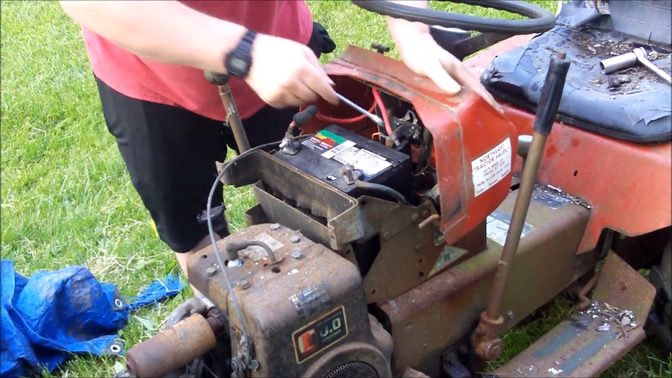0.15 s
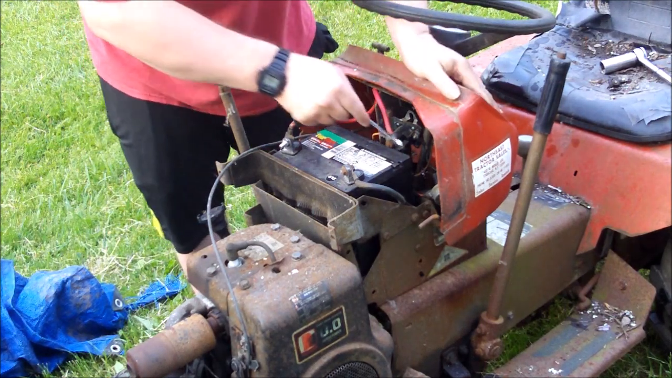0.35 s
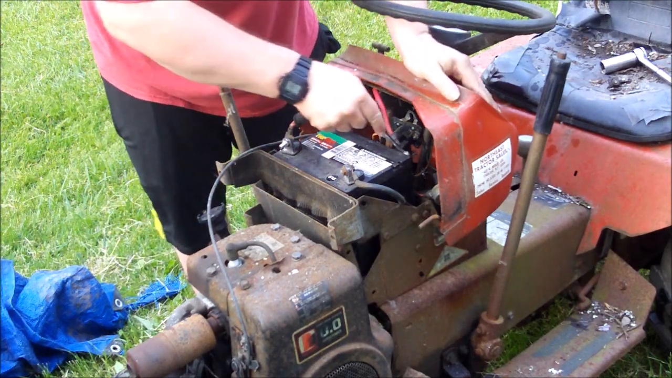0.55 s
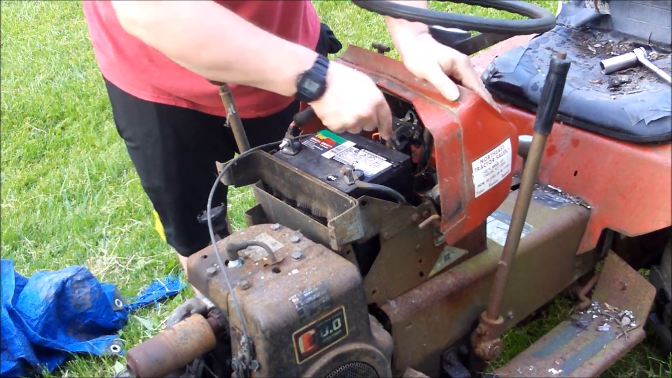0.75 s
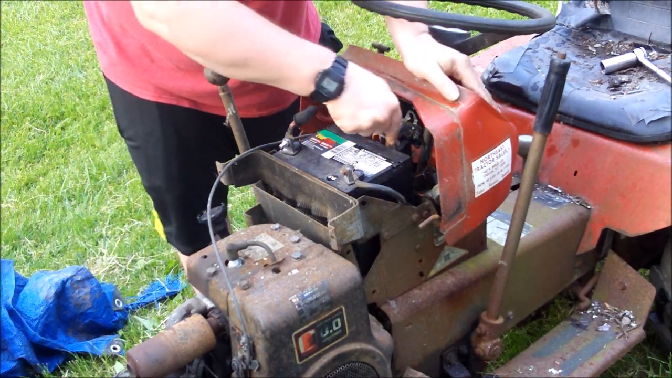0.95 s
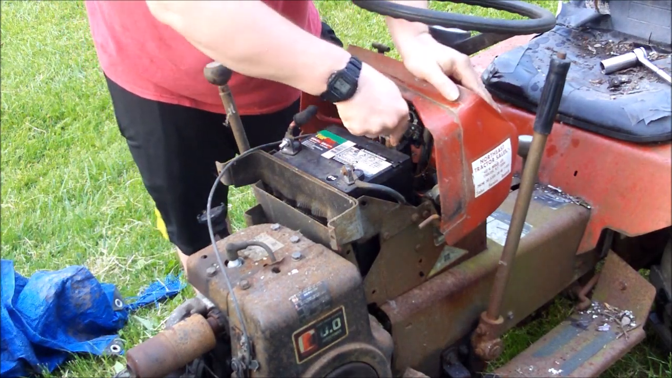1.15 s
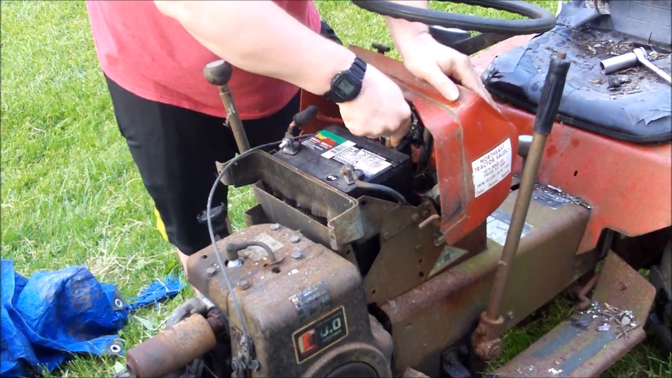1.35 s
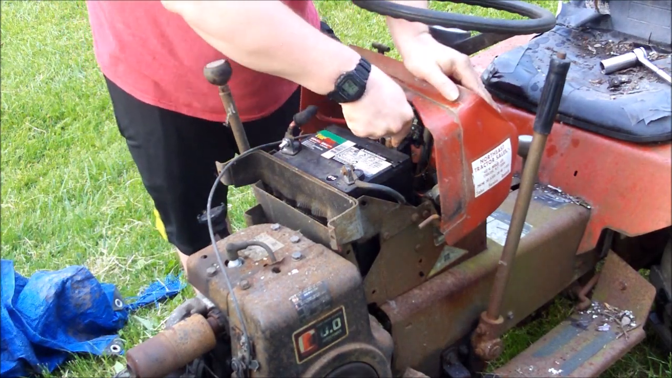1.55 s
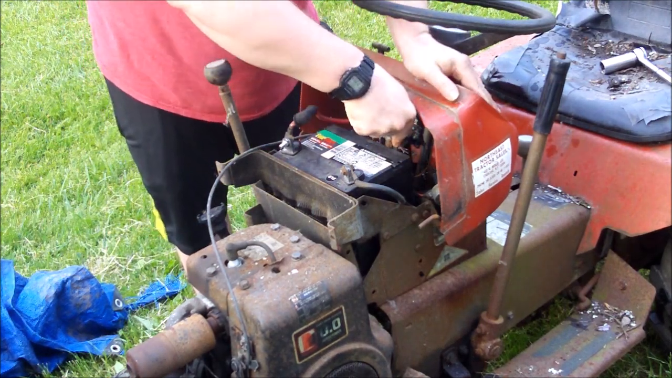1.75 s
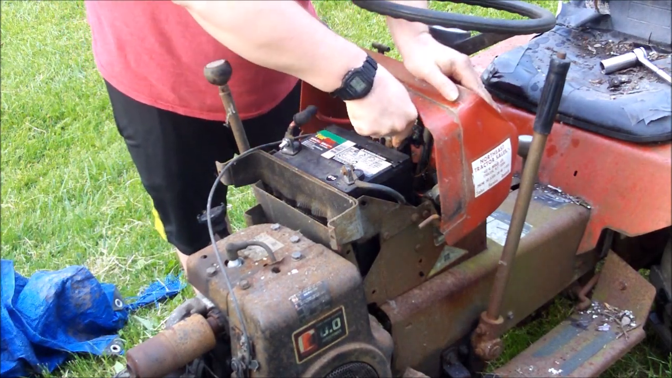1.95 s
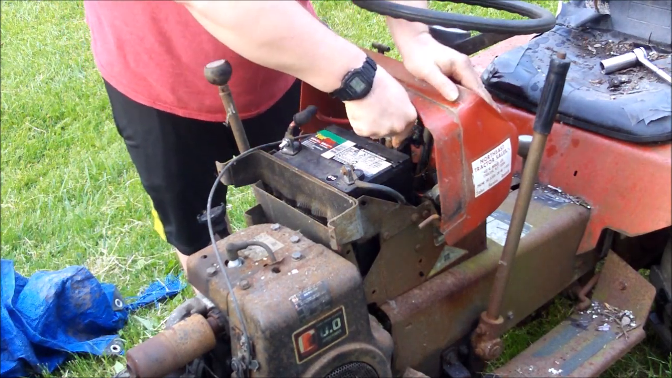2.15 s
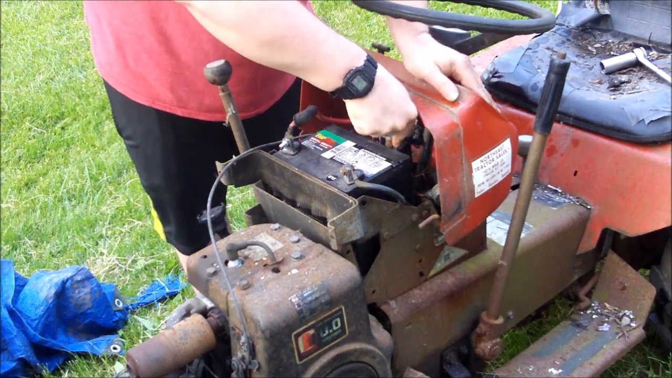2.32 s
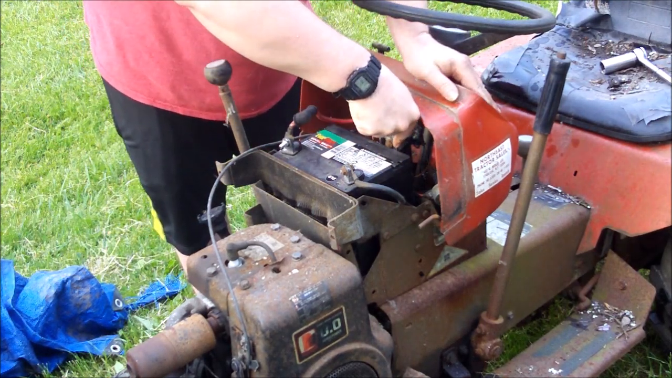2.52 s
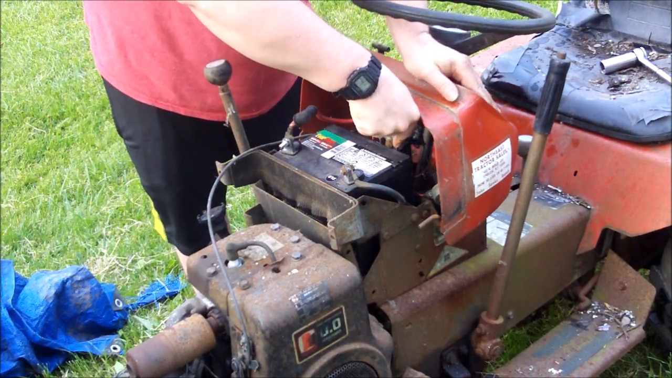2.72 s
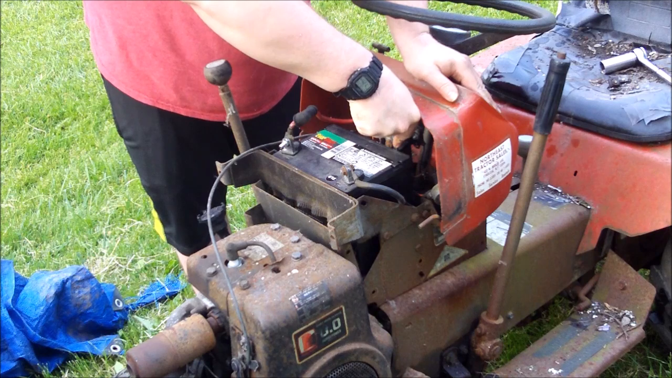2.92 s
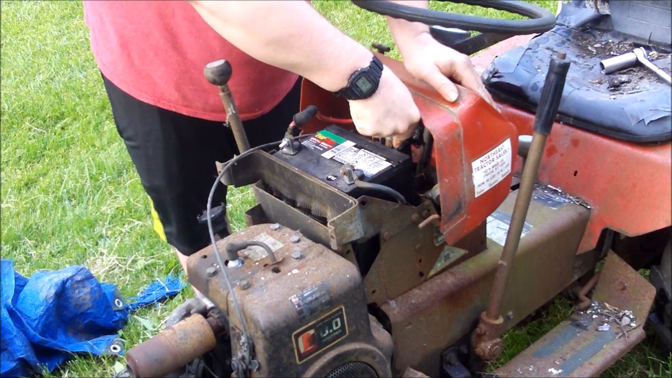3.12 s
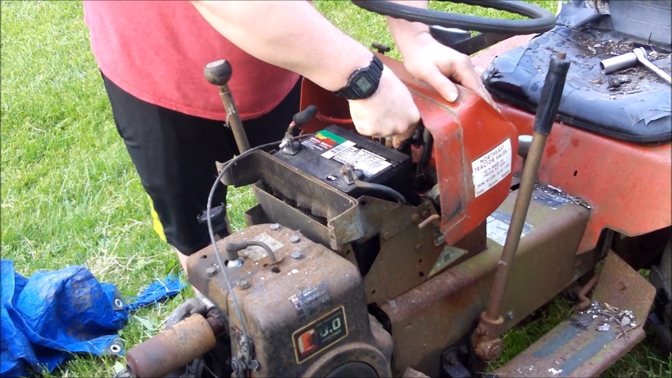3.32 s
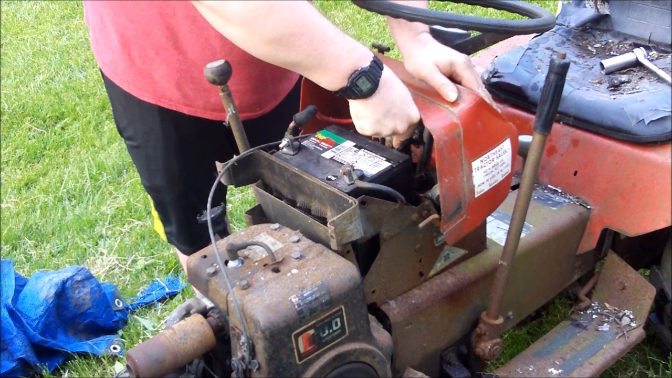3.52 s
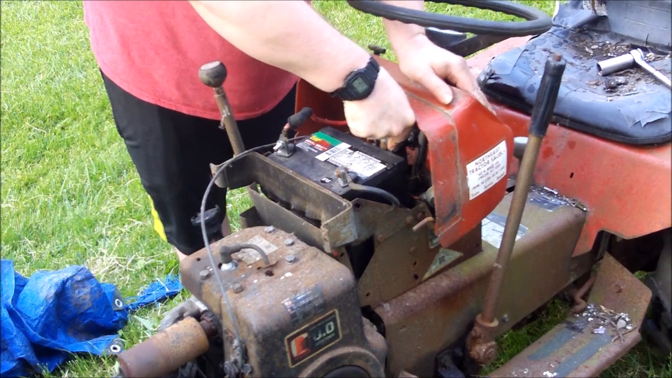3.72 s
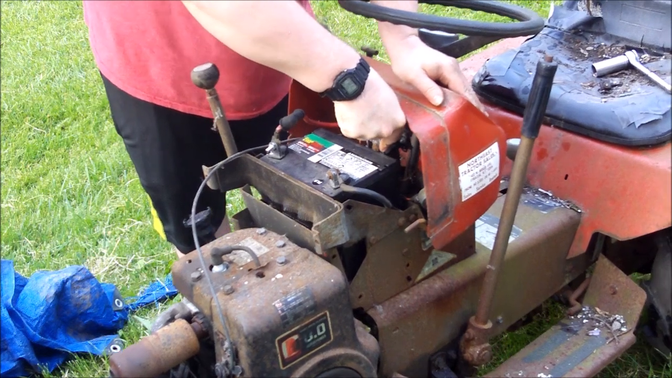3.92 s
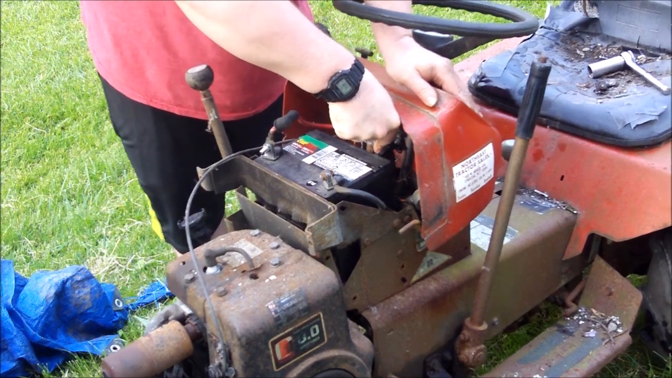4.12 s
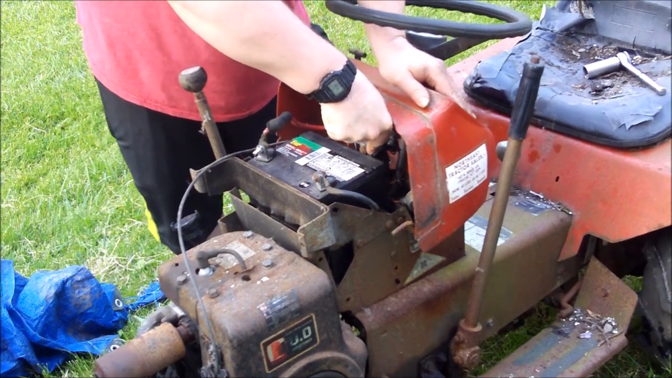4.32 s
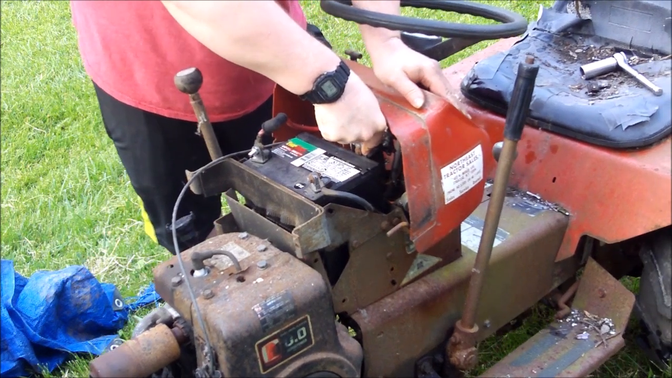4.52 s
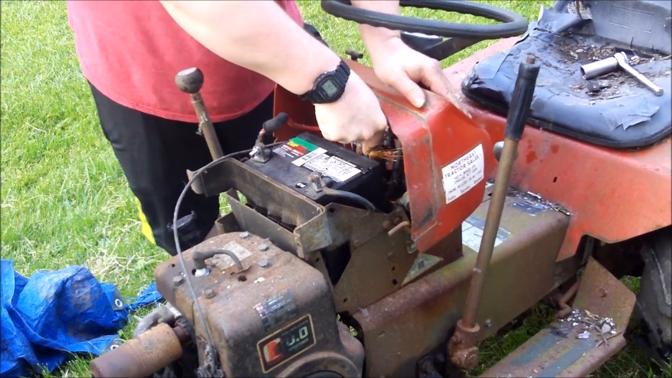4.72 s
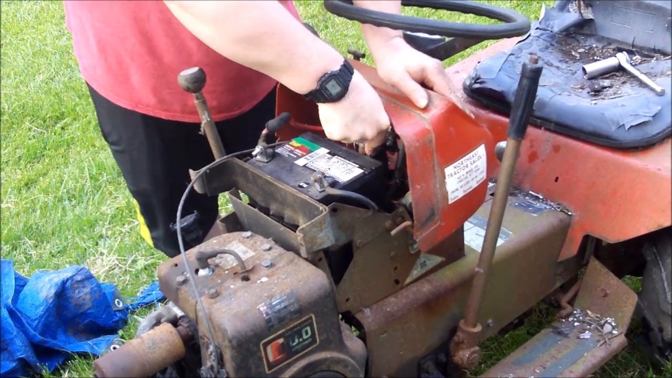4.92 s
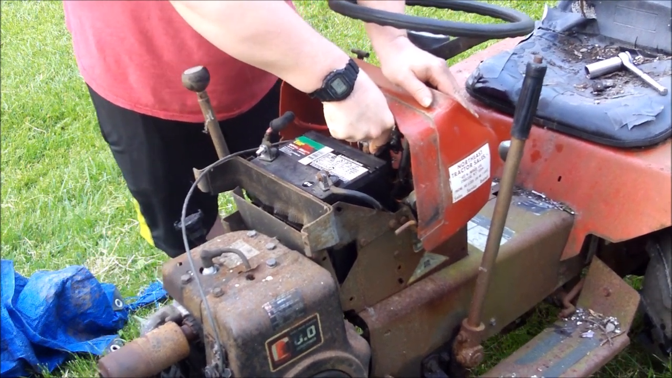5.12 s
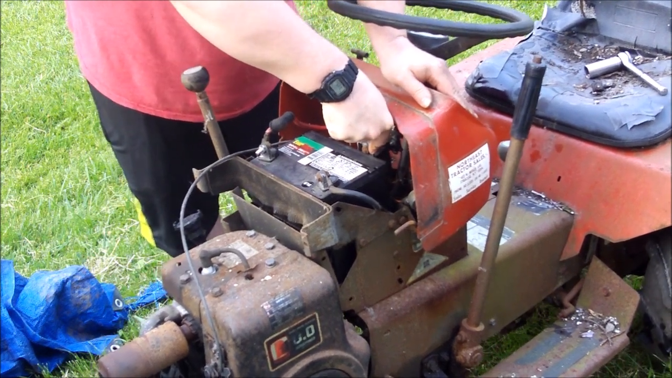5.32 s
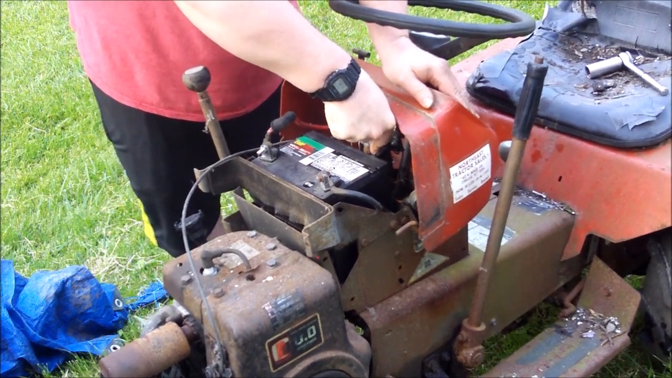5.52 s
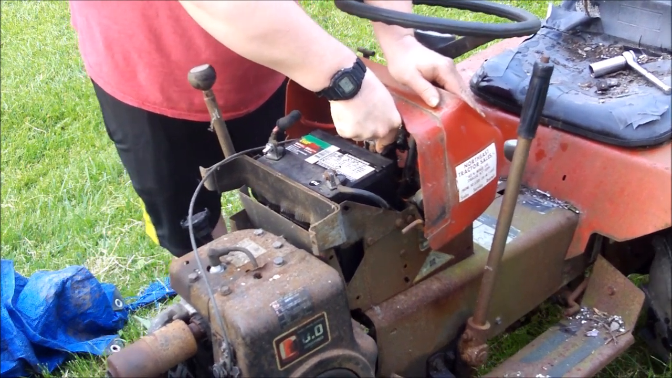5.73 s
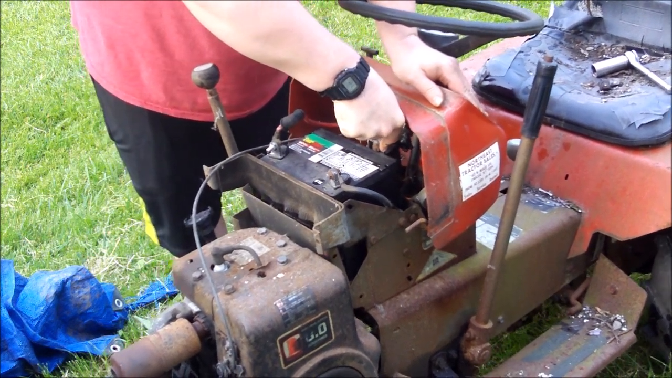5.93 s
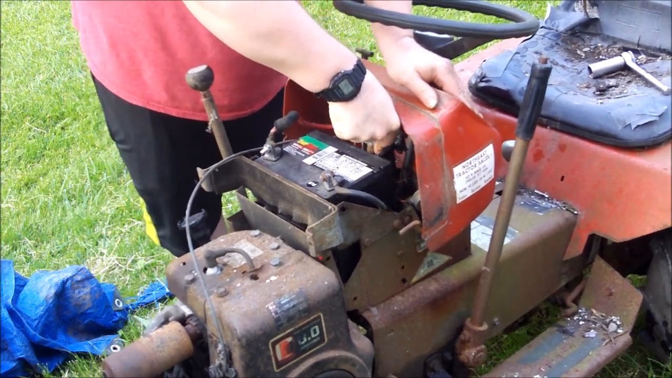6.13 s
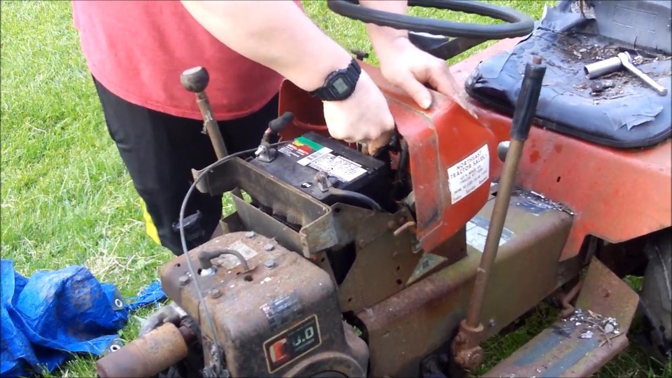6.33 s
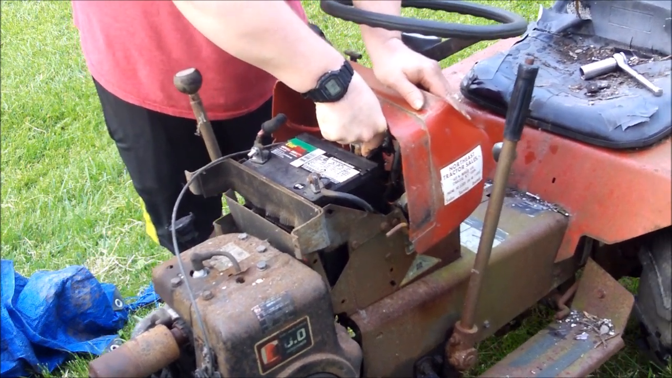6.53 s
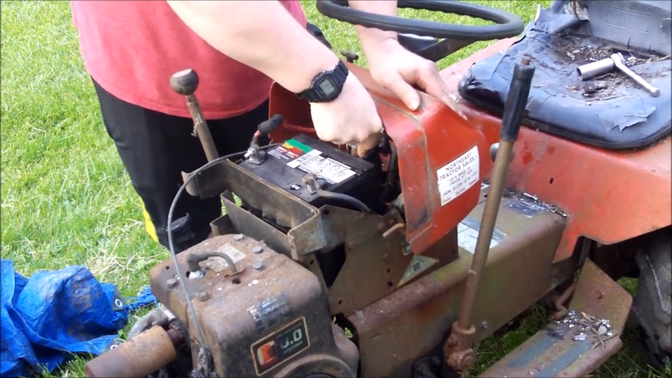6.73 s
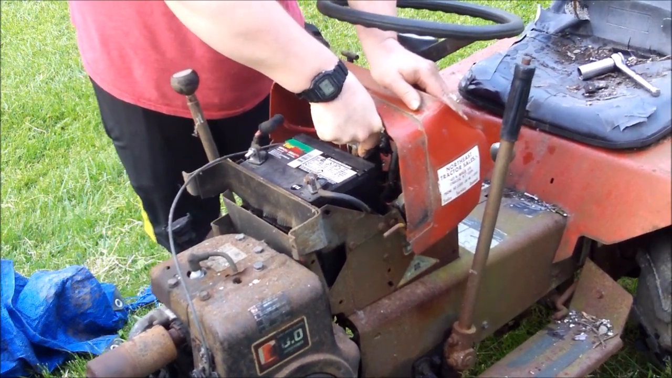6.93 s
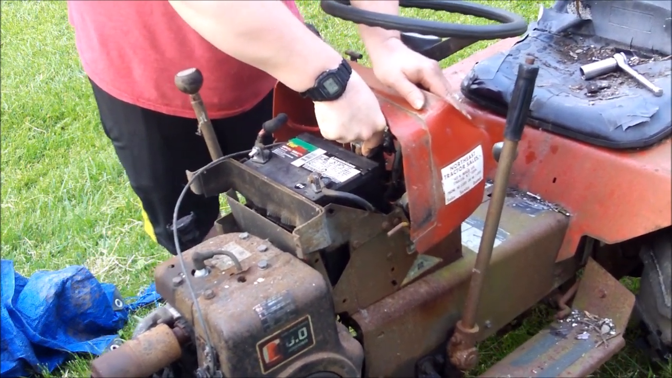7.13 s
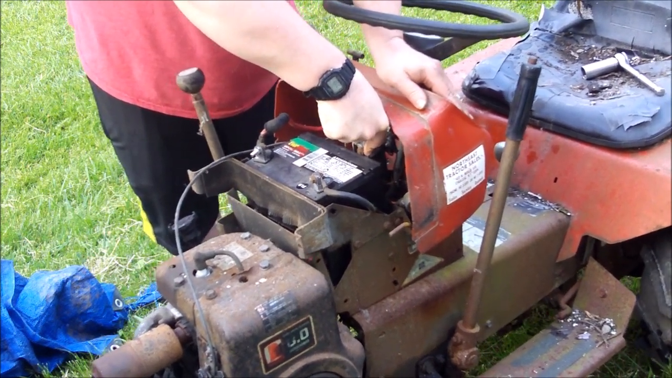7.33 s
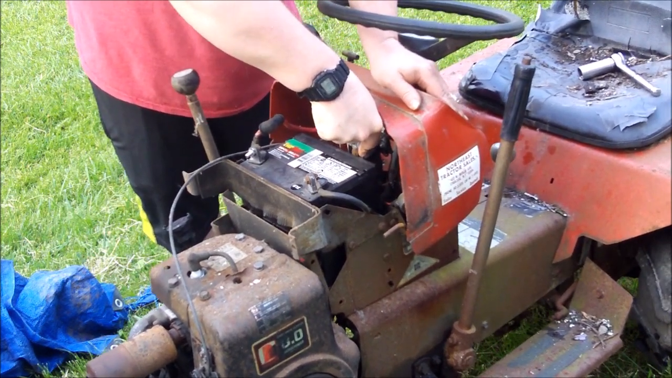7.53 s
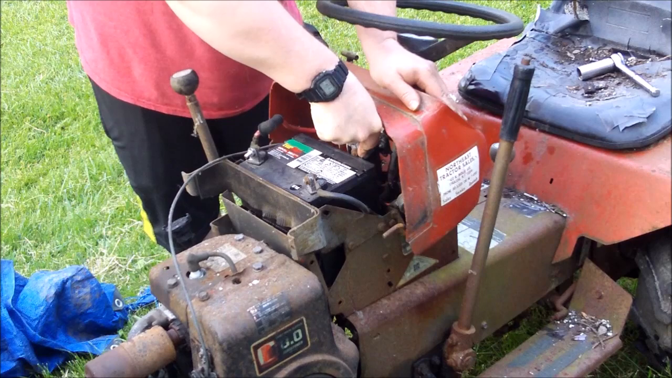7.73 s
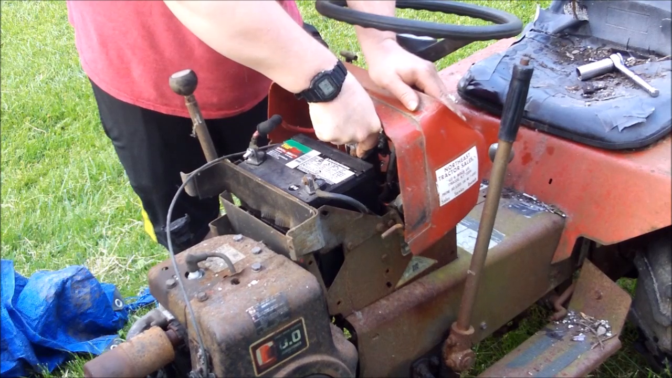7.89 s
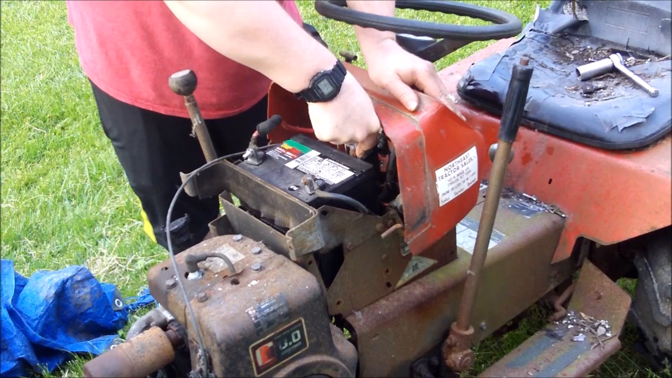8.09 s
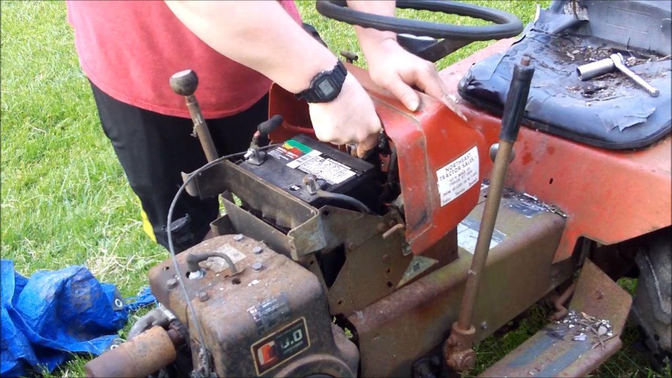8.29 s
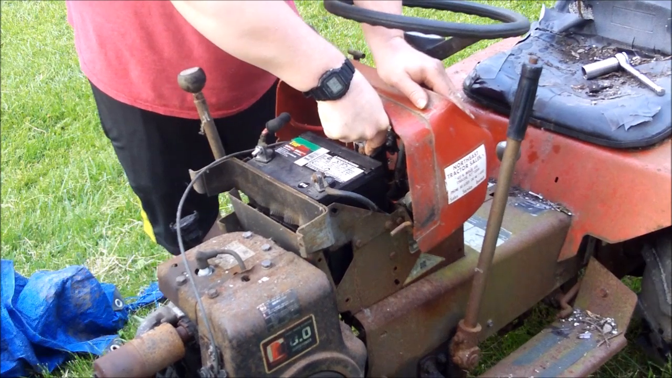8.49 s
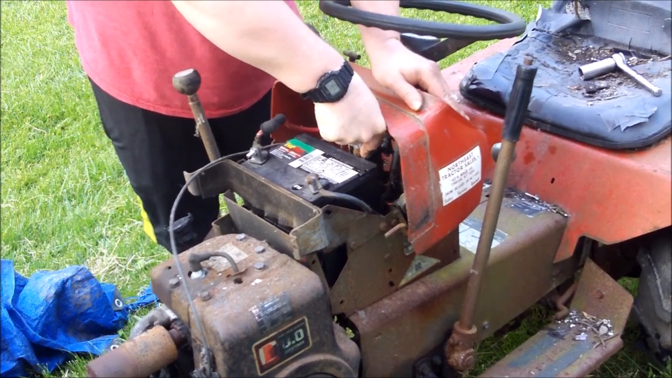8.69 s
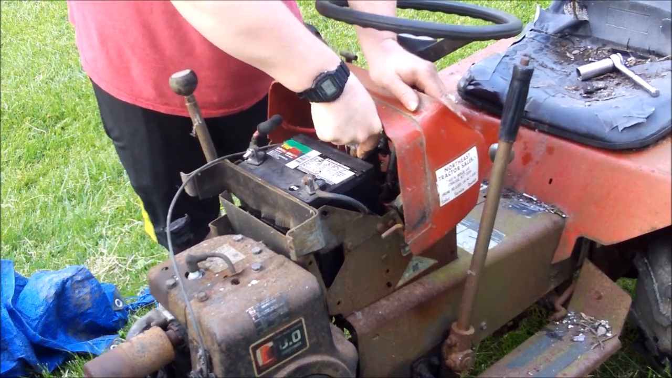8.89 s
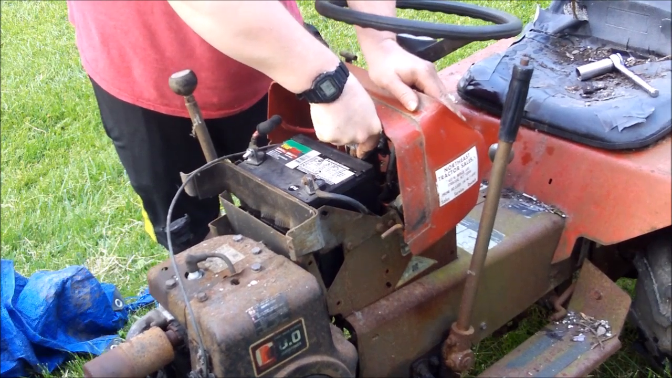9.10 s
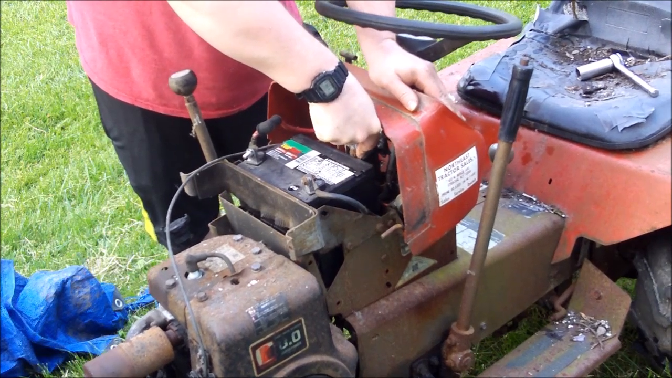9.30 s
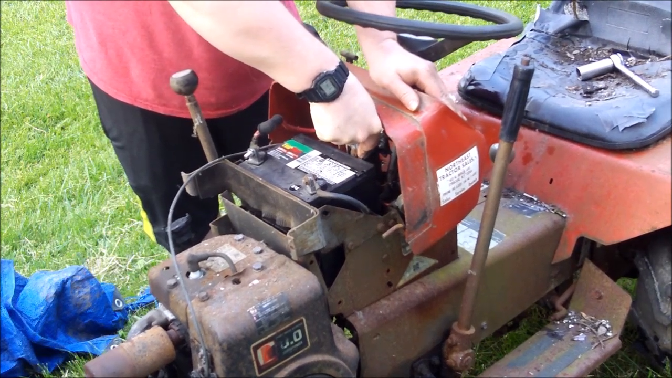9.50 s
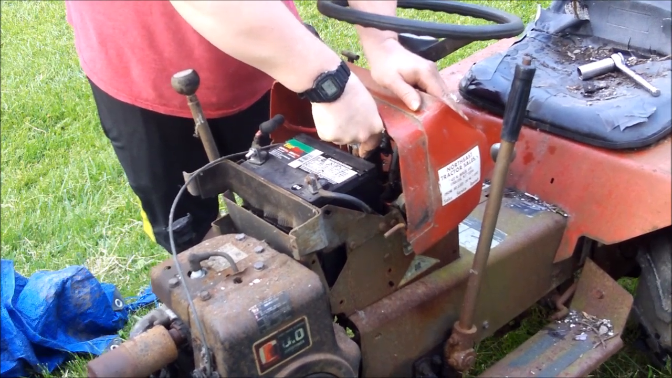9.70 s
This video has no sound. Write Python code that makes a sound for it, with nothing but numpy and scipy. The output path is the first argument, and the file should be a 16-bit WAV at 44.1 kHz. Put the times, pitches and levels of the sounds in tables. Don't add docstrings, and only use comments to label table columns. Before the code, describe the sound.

Dense, bright gear-tooth clatter from a starter motor, switched on and off by a slipping tool. Small sparks and clanks precede the first bursts; a longer grind starts with a singing metallic edge, turns to chatter, stutters rapidly, then holds on until a sudden stop. Dull distant air and a faint high electrical buzz lie behind. Dry open yard, close, slightly overloaded single microphone with little low end.

```python
import sys
import numpy as np
from scipy import signal
from scipy.fft import rfft, irfft
from scipy.io import wavfile
from scipy.ndimage import uniform_filter1d

SR = 44100
rng = np.random.default_rng(int(sys.argv[2]) if len(sys.argv) > 2 else 0)


def makeup_ratio(level_db):
    decades = np.asarray(level_db, float) / 20
    return 10 ** decades


def to_wav(s):
    ch = np.atleast_2d(s).T
    pcm = np.round(np.clip(ch, -1, 1) * 32767)
    wavfile.write(sys.argv[1], SR, pcm.astype(np.int16))


N = 429975
STEP = 32

# [f/Hz, level/dB per Hz]
AIR_SPECTRUM = [(30, -33), (60, -15.5), (124, -19), (200, -12.5), (300, -15.5), (460, -12.5), (900, -6),
                (1500, -10), (1800, -16.5), (2700, -18.5), (3700, -25.5), (6000, -27.5), (9000, -31),
                (16000, -48)]
# [width/Hz, level/dB, firm-seat gain/dB]
AIR_HZ = [452, 588, 767, 916, 1293, 1411, 1647, 2410, 3200]
AIR_MODES = [(40.4, 2.5, -14), (20, 0.5, 0), (20, 0, 0), (30, 4.5, 0), (15, -13, 0), (20, 1, 0),
             (20.2, -1, 0), (40, -24, 0), (30, -9, 0)]
# [t/s, level/dB]
AIR_GAIN = [(0, -52), (.5, -51.5), (.95, -50), (1.6, -50), (2.0, -55.5), (2.25, -55), (9.75, -77)]
# [f/Hz, level/dB]
FAR_TONES = [
    (964, -60),
    (1934, -70),
    (14987, -84),
]
# [t/s, gear level/dB, housing minus gear/dB, t60/s]
TICKS = [(0.664, -46, -9, 0.034), (.968, -22.5, -12, 0.038), (1.446, -48, 12.5, 0.071),
         (1.481, -39, -12, 0.045), (1.512, -48, 9, .07), (1.581, -64, 17, 0.058),
         (1.648, -41.5, -1.5, 0.071), (1.667, -26.5, 1.5, 0.5), (1.94, -53, -6, 0.031),
         (1.959, -42, -12, 0.033), (2.249, -48, -1, 0.14)]
# [f/Hz, level/dB per Hz]
TICK_SPECTRUM = [(1200, -31), (2200, -1), (2600, -2.5), (4000, 4), (6000, 3), (9000, 0.5), (15000, -13)]
# [makes t/s, breaks t/s, bite/dB, rise/s, coasting fall/dB per s]
CONTACTS = [(0.983, 1.333, 15.5, 0.02, 394), (1.673, 1.818, 11, .006, 406),
            (2.262, 4.658, 6.5, 0.0043, 400), (4.676, 4.72, -1.5, .02, 350), (4.753, 4.897, 4, 0.014, 650),
            (4.917, 4.952, 2.5, 0.0094, 495), (5.007, 5.265, 3.5, 0.0068, 330),
            (5.353, 5.506, 4, 0.0045, 242), (5.569, 5.607, 3.5, 0.014, 454), (5.646, 5.808, 3, 0.0122, 600),
            (5.815, 6.919, 3, .012, 320), (6.949, 9.568, 2.5, 0.01, 152), (9.61, 9.662, 4.5, 0.021, 242),
            (9.704, 9.803, 1.5, 0.015, 300)]
# [t/s, gear level/dB]
LOAD = [(1.0, -23), (1.3, -22.5), (1.75, -21.5), (2.4, -19), (2.7, -20.5), (2.95, -20), (3.25, -20.5),
        (3.6, -22), (4.4, -22), (4.9, -22), (5.2, -21), (5.6, -21), (6.25, -21.5), (6.7, -22), (7.7, -21.5),
        (8.4, -22), (9.3, -21.5), (9.7, -22.5)]
# [t/s, firmness 0-1]
SEAT = [
    (0, 0),
    (2.36, 0),
    (2.46, 1),
    (3.24, 1),
    (3.3, 0),
    (9.75, 0),
]
# [width/Hz, level/dB, firm-seat gain/dB]
HOUSING_HZ = [250, 366, 422, 455, 490, 545, 733, 820, 900, 950, 1090, 1195, 1250, 1410, 1943, 2085]
HOUSING_MODES = [(16.4, -19.5, -7), (24.3, -13.5, 4), (23.6, -16, -15), (23.8, -22, 19), (13.4, 4, -3.5),
                 (19.9, -12, -14), (12.1, -3.5, -1.5), (30.5, -9.5, 6), (29.8, -2.5, 3.5), (45.6, 0, 0),
                 (40, -4, 1), (44.3, -3, 0), (25, -20, -5), (30, -15.5, 9), (28.7, -0.5, -3),
                 (39.6, -10, 2.5)]
# [width/Hz, level/dB, firm-seat gain/dB]
GEAR_HZ = [3190, 3357, 3609, 3802, 3900, 4120, 4240, 4725, 5030, 5180, 5640, 5782, 5950, 6030, 6133, 6272,
           6446, 6715, 6935, 7300, 7390, 7660, 7830, 8042]
GEAR_MODES = [(39.6, -11.5, 6), (43, 0.5, 0), (40.6, -2, 2), (40.7, -2, 4), (50.3, -3, -6), (60, -7.5, 4),
              (60, -7, -9), (35.2, -4.5, -8), (35, -16, -3), (32, -1, -17), (40, -4, -13), (55.2, 5, -5),
              (39.8, -0.5, 0.5), (40, -13, 0), (30, 3, -12), (30, -15.5, 5), (40, -2, -6), (35, -11, 1),
              (40, -9.5, 3), (45, -10.5, -6), (45, -5.5, -5), (35.6, -12.5, 10), (40, -6.5, -9),
              (30, -6, -6)]
# [width/Hz, level/dB, firm-seat gain/dB]
SQUEAL_HZ = [8545, 8925, 9470, 10400, 10650, 11400, 12700, 13600, 13880, 14400]
SQUEAL_MODES = [(42.2, 0.5, 5.5), (60.3, 3.5, 0), (100, -2.5, -10), (60, -7.5, 10), (80.7, -7.5, 1),
                (60, -12.5, 7), (45, -7.5, 4), (40, -9, -2), (40, -4.5, -3), (45, -10.5, 6)]
# [f/Hz, level/dB per Hz]
HOUSING_SPECTRUM = [(40, -64), (160, -42.5), (300, -43), (370, -4.5), (480, -1), (580, -10), (800, -10.5),
                    (950, -6.5), (1100, -9), (1550, -4.5), (1750, -16.5), (1880, -36), (2000, -7),
                    (2250, -13.5), (3000, -12), (5000, -79.5)]
GEAR_SPECTRUM = [(1500, -57), (2200, -17), (2900, -6.5), (3300, 2), (4200, 1), (5000, 0), (5900, 3.5),
                 (6800, -4), (7600, -15.5), (9000, -22), (12000, -62)]
HISS_SPECTRUM = [(4410, -24), (7500, 0), (8470, -5), (9220, -1.5), (12000, -6), (14000, -9), (14800, -10.5),
                 (15200, -14.5)]
# [f/Hz, width/Hz, level/dB]
HOOD_MODES = [(366, 6, -7), (422, 5, 0), (488, 6, -4), (820, 6, -2), (890, 8, -6), (1091, 6, -1),
              (1947, 8, -10), (5800, 12, -24)]


def level(x, db):
    return x * makeup_ratio(db) / np.sqrt(np.mean(x ** 2))


def ring(x, hz, width_hz):
    return signal.lfilter(*signal.iirpeak(hz, hz / width_hz, fs=SR), x)


def colour(x, spectrum):
    hz, db = np.transpose(spectrum)
    size = 4096
    grid = np.log(np.maximum(np.arange(size // 2 + 1) * SR / size, 1))
    log_gain = np.interp(grid, np.log(hz), db) * np.log(10) / 20
    cepstrum = irfft(log_gain)
    cepstrum[1:size // 2] *= 2
    cepstrum[size // 2 + 1:] = 0
    impulse = irfft(np.exp(rfft(cepstrum)))
    return signal.fftconvolve(x, impulse)[:N]


def walk(rate):
    hold = int(SR / STEP / rate) + 1
    held = np.repeat(rng.standard_normal(N // STEP // hold + 2), hold)
    slewed = uniform_filter1d(uniform_filter1d(held, hold), hold)
    return 1.1 * slewed[:N // STEP + 1]


def full(control):
    return np.interp(np.arange(N) / STEP, np.arange(len(control)), control)


def metal(force, gain, firm, pitches, modes, spectrum, modes_db, patchy_db, patch_rate):
    width_hz, db, firm_db = np.transpose(modes)[:, :, None]
    wander = np.array([walk(patch_rate) for _ in pitches])
    catch = makeup_ratio(db + patchy_db * (1 - .85 * firm) * wander)
    catch /= np.sqrt(np.sum(catch ** 2 * width_hz, axis=0) * np.pi / SR)
    catch *= makeup_ratio(firm_db * firm)
    drive = force * gain
    rings = np.zeros(N)
    for share, hz, width in zip(catch, pitches, width_hz[:, 0]):
        struck = drive * np.repeat(share, STEP)[:N]
        rings += ring(ring(struck, hz, width), hz, 5 * width)
    clatter = level(colour(force[::-1], spectrum), 0)
    clatter *= full(makeup_ratio(-2.5 * firm * np.ones(wander.shape[1])))
    return gain * clatter + makeup_ratio(modes_db) * rings


def air(t):
    gain = makeup_ratio(np.interp(t, *np.transpose(AIR_GAIN)) + 0.72 * full(walk(11.0)))
    rush = metal(rng.standard_normal(N), gain, 0, AIR_HZ, AIR_MODES, AIR_SPECTRUM,
                 modes_db=-1, patchy_db=1.5, patch_rate=6)
    tones = np.zeros(N)
    for hz, db in FAR_TONES:
        loudness = makeup_ratio(db + 5.0 + 2.4 * full(walk(7.9)))
        tones += loudness * np.sin(2 * np.pi * hz * t + 1.2 * full(walk(30)))
    return rush + tones * gain / gain[0]


def charger(t):
    mains_hz, lag_cycles = 59.83, .48
    whine_hz, width_hz = 7864, 6.6
    since = (t * mains_hz - lag_cycles) % 1 / mains_hz
    whine = np.exp(-np.pi * width_hz * since) * np.cos(2 * np.pi * whine_hz * since)
    return level(whine, -60.5)


def ticks(t):
    gear, housing = np.zeros(N), np.zeros(N)
    for start, db, housing_db, t60 in TICKS:
        span = slice(int(start * SR), int((start + .5) * SR))
        fade = makeup_ratio(db - 60 * (t[span] - start) / t60)
        gear[span] += fade
        housing[span] += makeup_ratio(housing_db) * fade
    return gear, uniform_filter1d(housing, size=150, origin=70)


def tick_sound(tick_gear, tick_housing):
    crackle = level(colour(rng.standard_normal(N), TICK_SPECTRUM), -1)
    clank = level(ring(rng.standard_normal(N), hz=2300, width_hz=600), -5.5)
    return tick_gear * crackle + tick_housing * clank


def current(t):
    t = t[::STEP]
    bite_s, bite_per_rise = 0.026, 1.5
    bounce_db, bounce_fade_s, bounce_period_s = 3.5, .07, .085
    rise_db, coast_ease_s = 12, 0.24
    rundown_db, rundown_db_per_s = -47, 70
    load = np.interp(t, *np.transpose(LOAD)) + 1 * walk(25)
    gear_db = np.full(len(t), -90.)
    for makes, breaks, bite_db, rise, fall in CONTACTS:
        since = np.maximum(t - makes - rise, 0)
        coasting = np.maximum(t - breaks, 0)
        bite = bite_db * np.exp(-since / (bite_s + bite_per_rise * rise))
        rebound = np.exp(-since / bounce_fade_s) * np.sin(np.pi * since / bounce_period_s) ** 2
        onset = rise_db * np.clip(1 - (t - makes) / rise, 0, 1)
        grind = load + bite - bounce_db * rebound - onset
        coast = grind - fall * coasting / (1 + coasting / coast_ease_s)
        rundown = rundown_db - rundown_db_per_s * coasting
        gear_db = np.where(t >= makes, np.maximum(coast, rundown), gear_db)
    gear_db = full(gear_db)
    swing = gear_db + 21.5
    housing_db = -5 + (0.6 - 1) * swing
    hiss_db = -5.5 - 0.32 * np.maximum(swing, 0.45 * -swing)
    return gear_db, housing_db, hiss_db


def mesh(firm):
    shaft_hz, pinion_teeth = 18.8, 8
    turns = np.cumsum(shaft_hz * (1 + 0.064 * walk(9))) * STEP / SR
    tooth = np.cos(2 * np.pi * pinion_teeth * turns)
    wobble = np.cos(2 * np.pi * turns)
    wobble += .6 * np.cos(2 * 2 * np.pi * turns + walk(3)) + 1.1 * walk(50)
    return full(tooth), full((1 - firm) * wobble)


def blows(per_second, spread_db, rub):
    moment, strength, side = rng.random((3, N))
    size = makeup_ratio(-spread_db * np.log(1 - .998 * strength)) * np.sign(side - .5)
    return level((moment < per_second / SR) * size, 0) + rub * rng.standard_normal(N)


def thump(gear_db):
    jolt = np.maximum(uniform_filter1d(np.gradient(makeup_ratio(gear_db)), 200), 0) ** 2
    return level(ring(jolt, hz=45, width_hz=40), -74)


def hood():
    shake = rng.standard_normal(N)
    return level(sum(makeup_ratio(db) * ring(shake, hz, width_hz) for hz, width_hz, db in HOOD_MODES), -1)


def starter(t):
    tick_gear, tick_housing = ticks(t)
    gear_db, housing_db, hiss_db = current(t)
    firm = np.interp(t[::STEP], *np.transpose(SEAT))
    tooth, wobble = mesh(firm)
    gear = makeup_ratio(gear_db + 1.0 * tooth + 0.47 * wobble) + 0.16 * tick_gear
    housing = makeup_ratio(gear_db + housing_db + 1.13 * tooth) + tick_housing
    hiss = makeup_ratio(gear_db + hiss_db + 2.3 * tooth + 1.5 * wobble)
    coast = np.clip((-27 - gear_db) / 14, 0, 1)
    gripped = housing * (1 - .6 * coast)

    thuds = blows(per_second=1500, spread_db=1.0, rub=0.82)
    teeth = blows(per_second=2500, spread_db=2.0, rub=0.81)
    edges = blows(per_second=3600, spread_db=3.0, rub=0.86)
    low = metal(thuds, gripped, firm, HOUSING_HZ, HOUSING_MODES, HOUSING_SPECTRUM,
                modes_db=2, patchy_db=1.5, patch_rate=12)
    middle = metal(teeth, gear, firm, GEAR_HZ, GEAR_MODES, GEAR_SPECTRUM,
                   modes_db=2.0, patchy_db=6.0, patch_rate=45)
    high = metal(edges, hiss, firm, SQUEAL_HZ, SQUEAL_MODES, HISS_SPECTRUM,
                 modes_db=-4.5, patchy_db=10.0, patch_rate=55)
    grinding = makeup_ratio(-3) * low + makeup_ratio(-5) * middle + makeup_ratio(-1.5) * high
    return tick_sound(tick_gear, tick_housing) + grinding + thump(gear_db) + housing * coast * hood()


def scene():
    t = np.arange(N) / SR
    return (air(t) + charger(t) + starter(t))[None]


def top_cut(x):
    return signal.sosfilt(signal.butter(12, 16240, fs=SR, output="sos"), x)


def record(dry):
    bass = signal.butter(2, 130, "high", fs=SR, output="sos")
    top = signal.ellip(10, .2, 70, 15280, fs=SR, output="sos")
    rounded = np.tanh(1.15 * dry) / 1.15
    mix = signal.sosfilt(np.vstack([bass, top]), rounded)
    return top_cut(mix)


dry = scene()
out = record(dry)
to_wav(out)
```